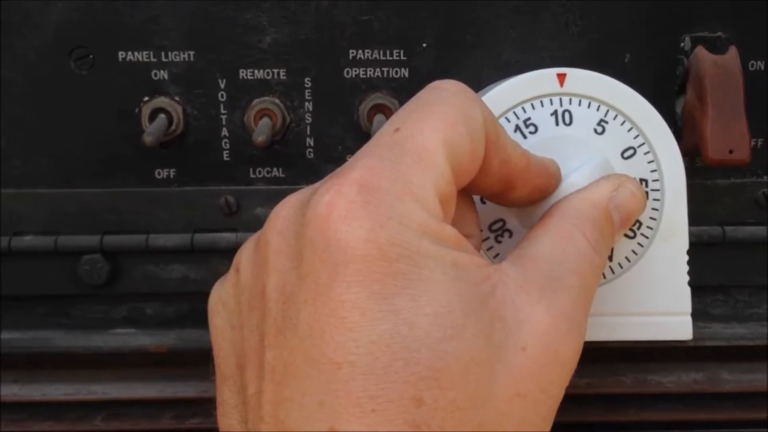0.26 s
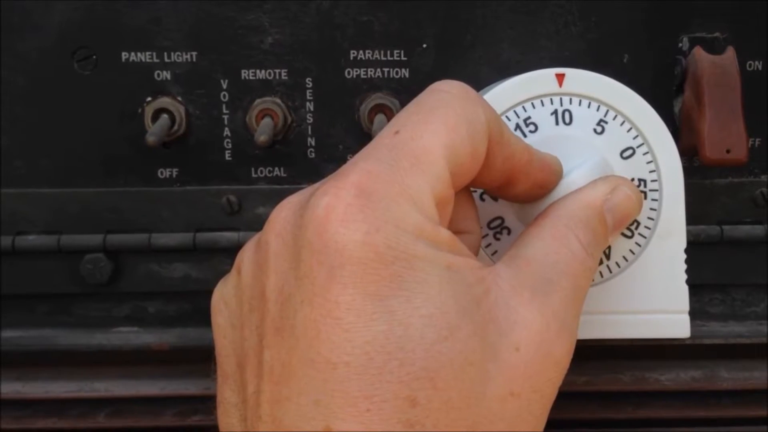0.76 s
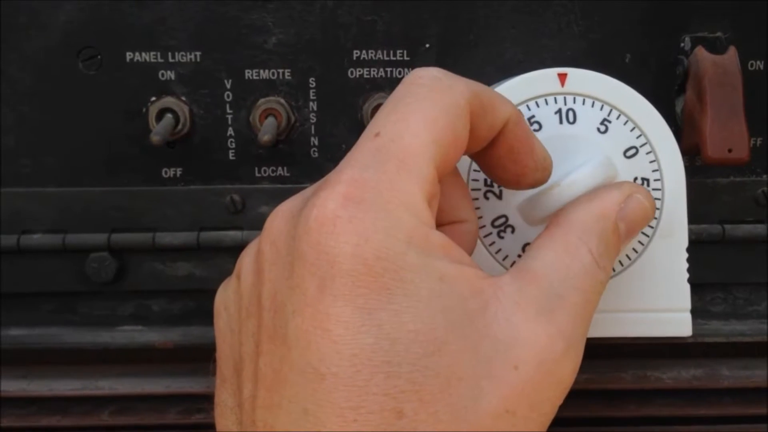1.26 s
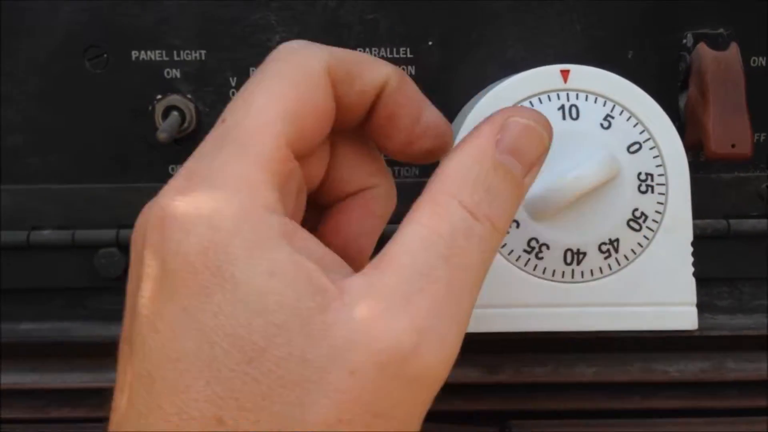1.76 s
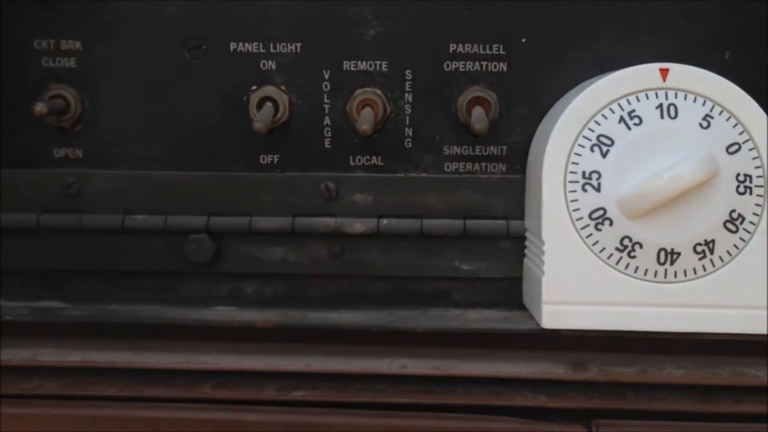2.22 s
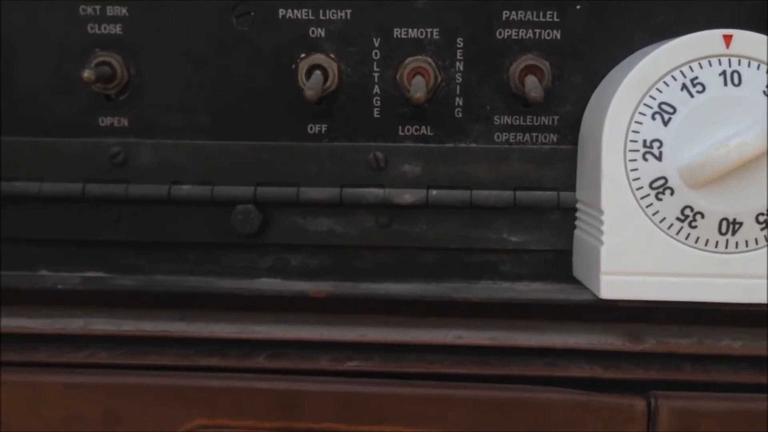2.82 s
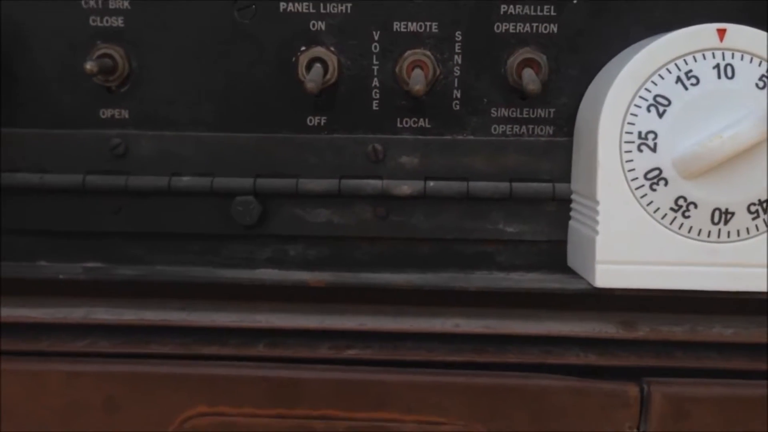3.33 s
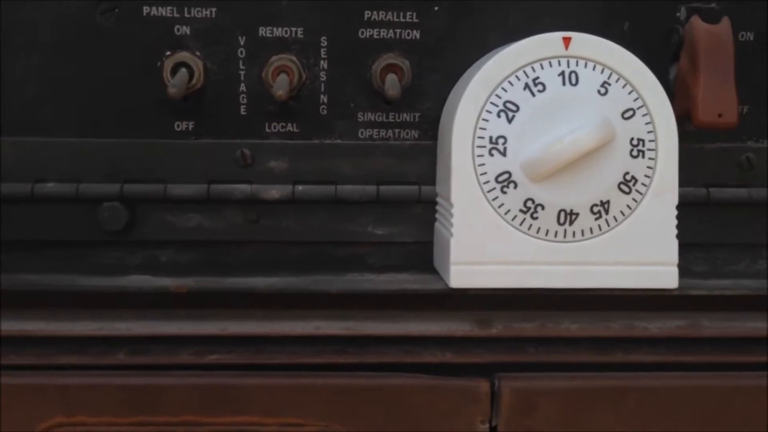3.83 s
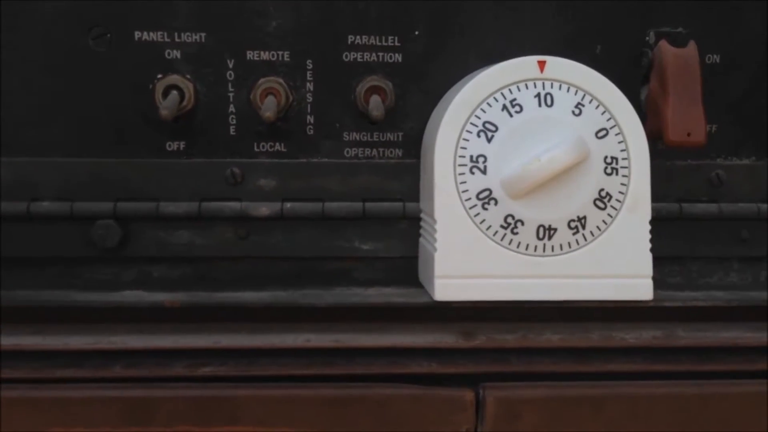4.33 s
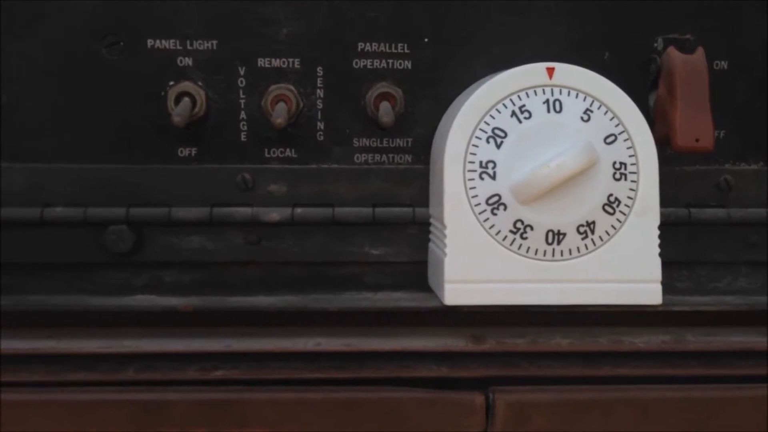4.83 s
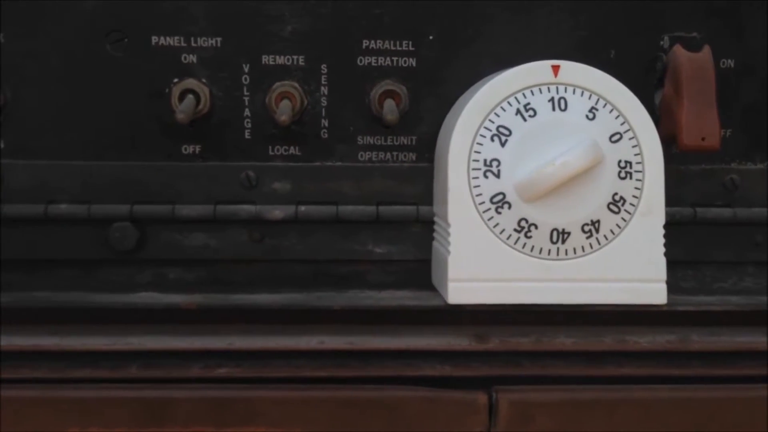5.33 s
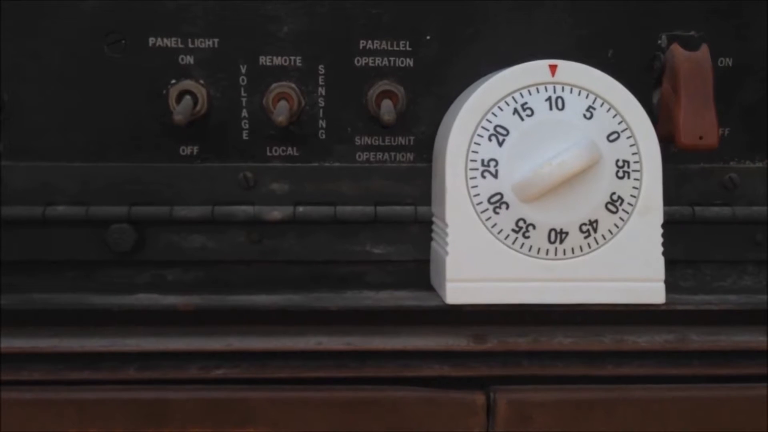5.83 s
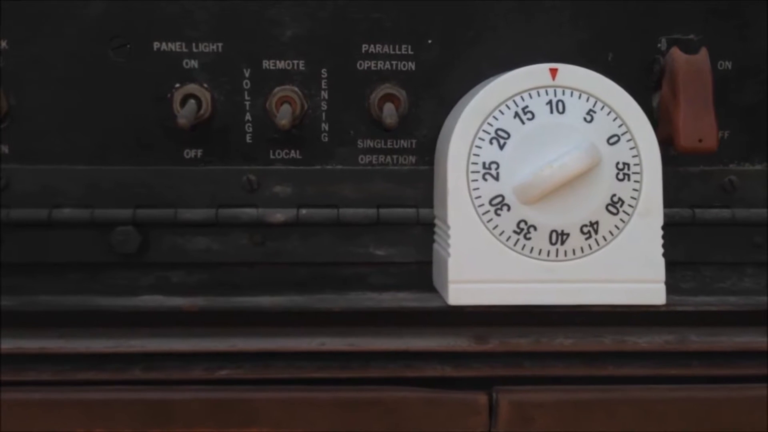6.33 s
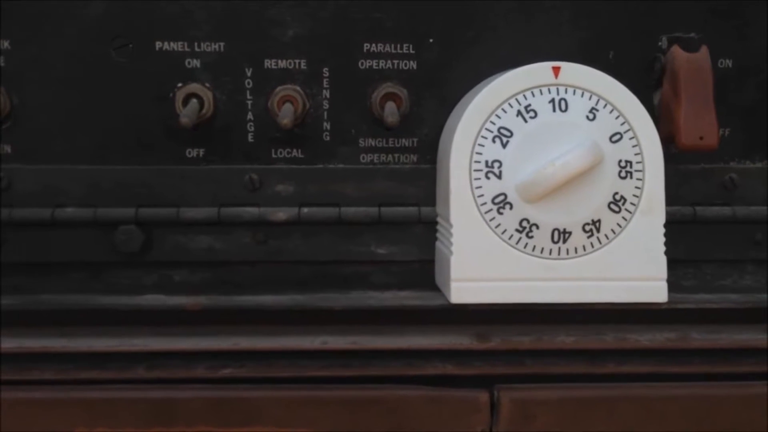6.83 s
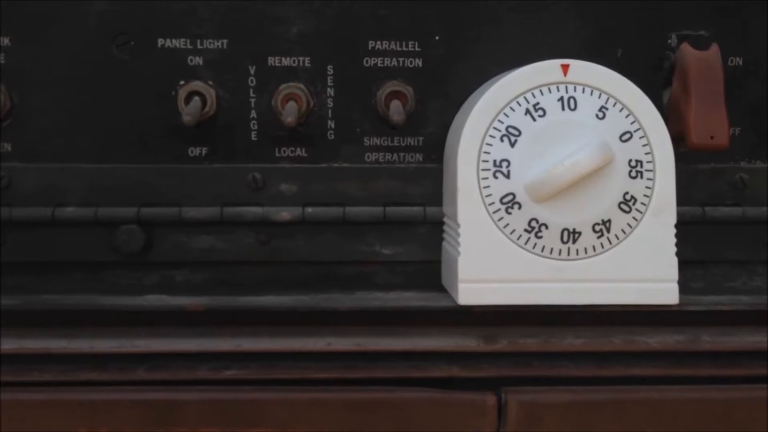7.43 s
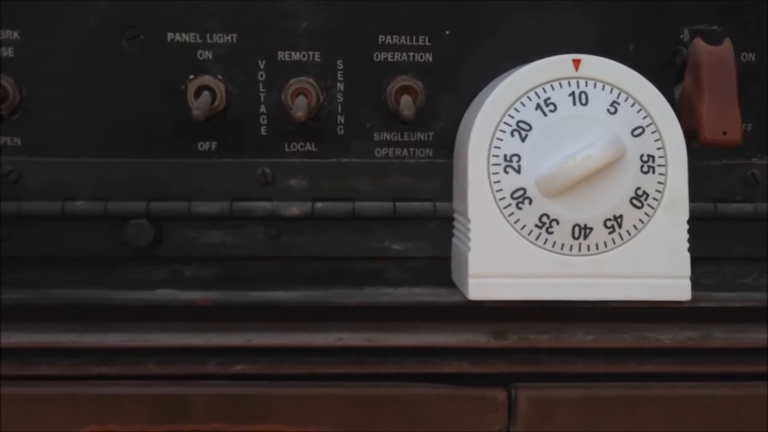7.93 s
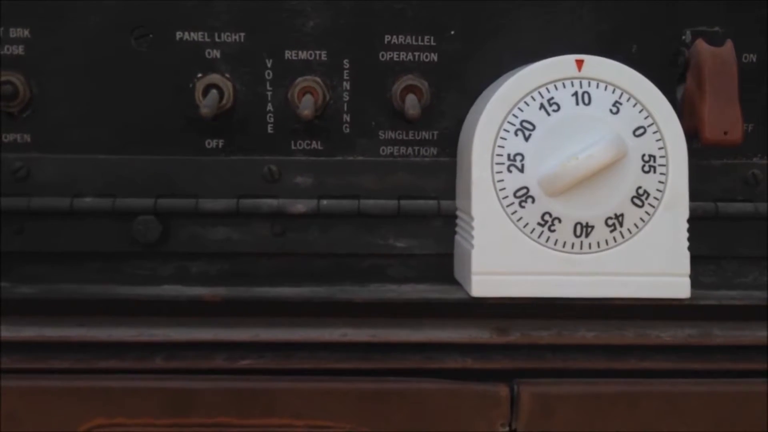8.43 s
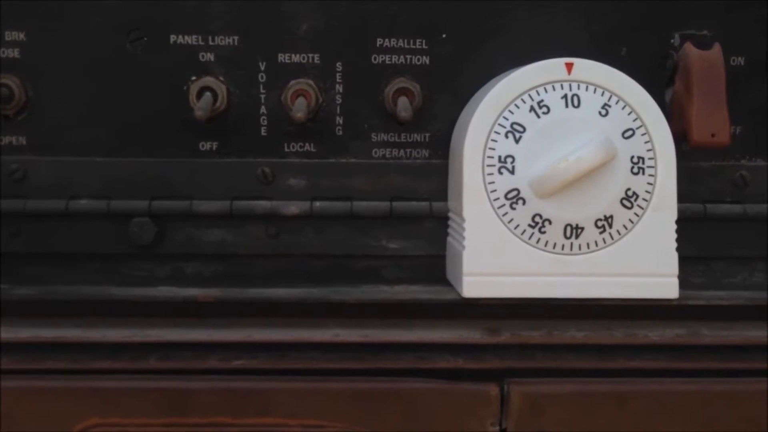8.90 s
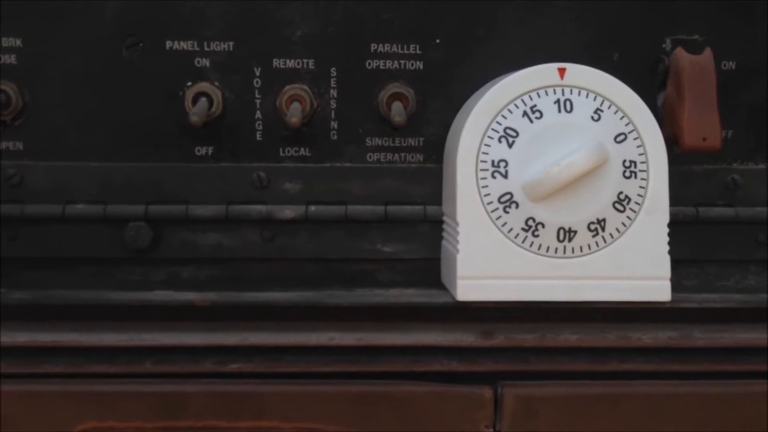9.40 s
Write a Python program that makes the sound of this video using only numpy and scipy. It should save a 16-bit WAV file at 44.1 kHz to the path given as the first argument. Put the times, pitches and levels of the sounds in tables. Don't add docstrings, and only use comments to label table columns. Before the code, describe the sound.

A wind-up timer ticks faintly, a toggle switch snaps, then a starter slams and a big diesel engine wheezes, catches, surges and drones steadily.

```python
import sys
import numpy as np
from scipy import signal
from scipy.fft import rfft, irfft, next_fast_len
from scipy.io import wavfile

SR = 44100
rng = np.random.default_rng(int(sys.argv[2]) if len(sys.argv) > 2 else 0)


def undo_db(level):
    steps = np.asarray(level, float) / 20
    return 10 ** steps


def wav_out(sig):
    wavfile.write(sys.argv[1], SR, np.round(np.clip(np.atleast_2d(sig).T, -1, 1) * 32767).astype(np.int16))


N = 426006
TIME_S = np.arange(N) / SR


def noise(count=N):
    return rng.standard_normal(count)


def evened(x):
    return x / np.sqrt(np.mean(x ** 2) + 1e-20)


def read(points, hz):
    f, value = np.transpose(points)
    return np.interp(np.log(hz + 1), np.log(f + 1), value)


def bumps(modes, hz):
    return sum(db / (1 + (2 * (hz - f) / width) ** 2) for f, width, db in modes)


def curves(rows):
    s, *columns = np.transpose(rows)
    return [np.interp(TIME_S, s, c) for c in columns]


def add(mix, s, sound):
    part = mix[round(s * SR):][:len(sound)]
    part += sound[:len(part)]


def coloured(x, gain_db):
    size = next_fast_len(len(x))
    gain = undo_db(gain_db(np.fft.rfftfreq(size, 1 / SR)))
    return evened(irfft(rfft(x, size) * gain, size)[:len(x)])


def wobble(per_s):
    return coloured(noise(), lambda hz: -20 * np.log10(1 + (hz / per_s) ** 2))


def rung(modes, drive, spread):
    t = np.arange(SR // 3) / SR
    tune = 1 + spread * noise(len(modes))
    ring = 0
    for (hz, db, t60), k in zip(modes, tune):
        ring = ring + undo_db(db - 60 * t / t60) * np.sin(2 * np.pi * hz * k * t)
    out = signal.fftconvolve(ring, drive)
    return out / abs(out).max()


def burst(spectrum, rise, t60):
    t = np.arange(SR // 2) / SR
    out = coloured(noise(len(t)), lambda hz: read(spectrum, hz))
    out = out * np.minimum(t / rise, 1) * undo_db(-60 * t / t60)
    return out / abs(out).max()


def tent(s, rise_db_per_s, fall_db_per_s):
    t = TIME_S - s
    return np.where(t < 0, rise_db_per_s * t, -fall_db_per_s * t)


def peaks(rows, rise_db_per_s, fall_db_per_s):
    tents = [db + tent(s, rise_db_per_s, fall_db_per_s) for s, db in rows]
    return np.maximum(np.max(tents, 0), 0)


def swells(rows):
    power, t = np.zeros(N), np.arange(SR) / SR
    for s, db, length in rows:
        shape = np.minimum(6.5 * t / length, 1) / (1 + (t / length) ** 6)
        add(power, s, (undo_db(db) * shape) ** 2)
    return np.sqrt(power)


def fade_in(start_s, length_s):
    return np.clip((TIME_S - start_s) / length_s, 0, 1)


def sounding(rows):
    return np.clip(np.minimum(TIME_S - rows[0][0], rows[-1][0] + 0.018 - TIME_S) / 0.024, 0, 1)


# time_s, firings_per_s
SPEED = [(5.7, 2), (6.0, 9), (6.4, 14), (6.6, 25), (6.7, 34.4), (6.93, 44.1), (7.14, 54), (7.35, 62.3),
         (7.5, 69), (7.62, 71.3), (7.7, 71), (7.85, 69.2), (8.0, 67.9), (8.3, 65.7), (8.45, 64.8),
         (8.75, 63.8), (9.05, 62.95), (9.66, 62.3)]
# time_s, effort_db
EFFORT = [(5.7, -15), (6.0, -3.5), (6.3, -3.5), (6.6, -3), (6.79, 2.5), (7.08, 2.5), (7.24, 5), (7.48, 5.5),
          (7.62, -0.5), (7.75, -3.5), (8.06, -2.5), (8.6, 0), (9.0, 0), (9.66, 0.5)]
RATED_PER_S = 63
# pitch_hz, level_db
PIPE = [(45, 5), (63, -17.5), (70, -4.5), (118, -2), (141, -1.5), (190, 0), (250, -6.5), (270, -7.5)]
# pitch_hz, width_hz, level_db
PIPE_NOTCH = [(132, 2.9, -9.5)]
ORDERS_DB = [-18.5, -14, -11, -23]
ORDER_WANDER_DB = [2, 1.54, 0.22, 0.81]
# multiple_of_six_stroke_cycle, level_db
LOPE = [(4, -34), (5, -32), (7, -25), (8, -27), (9, -25), (10, -19), (11, -15), (13, -21), (14, -27),
        (15, -20), (16, -19), (17, -25), (19, -20), (20, -24), (21, -24), (28, -25), (30, -26), (32, -28),
        (35, -27), (36, -25), (39, -29), (44, -28), (48, -26)]
LOPE_DB, LOPE_DB_PER_HZ = -11.5, -0.5
LOPE_PEAK_PER_S, LOPE_FADE_DB_PER_HZ = 57, .6
CAUGHT_PER_S, MISFIRE_DB_PER_HZ = 61.5, 0.6
# time_s, level_db
SURGES = [
    (7.27, 7.5),
    (7.365, 7),
    (7.55, 7),
    (7.625, 4.5),
    (7.705, 2.5),
    (7.8, 3.5),
]
SURGE_DB_PER_S, ORDER_EFFORT = 136, 0.023


def exhaust(turns):
    speed, effort_db = curves(SPEED)[0], curves(EFFORT)[0]
    cycle_hz = speed / 6
    misfire_db = MISFIRE_DB_PER_HZ * np.minimum(speed - CAUGHT_PER_S, 0)
    surge_db = peaks(SURGES, SURGE_DB_PER_S, SURGE_DB_PER_S)
    lines = []
    for k, db, wander_db in zip((6, 12, 18, 24), ORDERS_DB, ORDER_WANDER_DB):
        pipe_db = read(PIPE, k * cycle_hz) + bumps(PIPE_NOTCH, k * cycle_hz)
        fuel_db = ORDER_EFFORT * effort_db + (k == 12) * surge_db + k / 6 * misfire_db
        lines.append((k, db + pipe_db + fuel_db + wander_db * wobble(14.0)))
    lope_db = LOPE_DB + LOPE_DB_PER_HZ * np.clip(speed - RATED_PER_S, LOPE_PEAK_PER_S - RATED_PER_S, 0)
    lope_db += LOPE_FADE_DB_PER_HZ * np.minimum(speed - LOPE_PEAK_PER_S, 0)
    for k, db in LOPE:
        reach_db = -10 * np.log10(1 + (55 / (k * cycle_hz)) ** 4)
        lines.append((k, lope_db + db + reach_db))
    drift = .011 * wobble(6)
    drone = sum(undo_db(db + 2) * np.sin(2 * np.pi * (k / 6 * (turns + drift) + rng.random()))
                for k, db in lines)
    return drone * fade_in(6.55, 0.55)


# time_s, peak_db, pitch_hz
FIRINGS = [
    (6.512, -17, 159),
    (6.606, -21, 110),
    (6.649, -16, 196),
    (6.734, -13, 190),
    (6.805, -12, 150),
    (6.844, -11, 156),
    (6.904, -14, 140),
    (6.984, -12, 135),
    (7.084, -12, 140),
    (7.156, -12, 175),
]
FIRING_T60, FIRING_RISE_S = 0.16, 0.0046


def firings():
    out, t = np.zeros(N), np.arange(SR // 5) / SR
    for s, db, hz in FIRINGS:
        ring = np.sin(2 * np.pi * hz * t) + 0.12 * np.sin(2 * np.pi * 2.1 * hz * t)
        add(out, s, undo_db(db - 60 * t / FIRING_T60) * np.minimum(t / FIRING_RISE_S, 1) * ring)
    return out


# time_s, peak_db, t60_s
STARTER = [
    (5.708, -31, 0.068),
    (5.7165, -16.5, 0.11),
    (5.736, -21, .06),
    (5.75, -25, 0.087),
    (5.762, -20, 0.092),
    (5.779, -3, 0.17),
]
SLAM_S = STARTER[-1][0]
# time_s, peak_db, length_s
PUFFS = [
    (6.049, -14, 0.061),
    (6.073, -11.5, 0.073),
    (6.169, -15, 0.066),
    (6.252, -17, 0.052),
    (6.363, -22, 0.035),
    (6.427, -19.5, 0.03),
    (6.493, -18.5, 0.038),
    (6.559, -18.5, 0.077),
    (6.665, -15, 0.092),
]
# start_s, level_db, length_s
GASPS = [(6.05, -60, .03), (6.07, -38.5, 0.034), (6.095, -55, 0.039), (6.172, -57, .03),
         (6.198, -56, 0.027), (6.265, -59, .03), (6.286, -48, 0.024), (6.363, -53, .035), (6.428, -48, .02),
         (6.45, -48, .04), (6.49, -47, 0.031), (6.565, -43, 0.021), (6.582, -51, .05), (6.635, -51, 0.061),
         (6.38, -55, .04), (6.52, -57, .04), (6.68, -44, .03), (6.74, -48, 0.075), (6.82, -57, 0.16)]
# rated_speed_db, effort_share, db_per_firing_per_s_off_rated, under_wheeze_db
REGISTERS = [(-23.5, 0.56, 0.63, -27), (-25.5, 1, 0.08, -17.5), (-28.5, 0.92, 0, -35),
             (-45, .15, 0.02, -39)]
# build_up_db_per_s, peak_db, fall_db_per_s
ENGAGE = [(490, -24.5, 100), (560, -17.5, 102), (464, -21, 144), (398, -30, 180)]
RUSH_DB = [-28.5, -32, -48, -35.5]
RUSH_S, RUSH_LENGTH_S = 6.68, .3
AIR_SHUT_DB, AIR_OPENS_PER_S = -5, 30


def levels():
    off_rated = curves(SPEED)[0] - RATED_PER_S
    effort_db = curves(EFFORT)[0]
    wheeze = swells(PUFFS)
    rush = swells([(RUSH_S, 0, RUSH_LENGTH_S)])
    slow = np.clip((AIR_OPENS_PER_S - RATED_PER_S - off_rated) / 10, 0, 1)
    gasps = 0, 0, 0, swells(GASPS)
    for register, engage, rush_db, gasp in zip(REGISTERS, ENGAGE, RUSH_DB, gasps):
        db, share, slope_db, wheeze_db = register
        rise, slam_db, fall = engage
        steady = undo_db(db + share * effort_db + slope_db * off_rated + tent(SLAM_S, rise, 0))
        steady = steady * undo_db(AIR_SHUT_DB * np.any(gasp) * slow)
        slam = undo_db(slam_db + tent(SLAM_S, rise, fall))
        parts = steady, undo_db(6) * gasp, undo_db(wheeze_db) * wheeze, undo_db(rush_db) * rush, slam
        yield np.sqrt(sum(p ** 2 for p in parts))


# pitch_hz, level_db_per_hz
THUD = [(15, -18), (40, -1), (65, 3.5), (110, 8), (150, 9.5), (220, 8.5), (300, -5.5), (450, -45.5)]
# pitch_hz, level_db_per_hz
RUNNING = [(150, -17), (270, -1.5), (500, -6), (1000, -7.5), (2100, -15), (4400, -23.5), (5600, -30),
           (7500, -38), (10000, -43.5), (13000, -51), (15500, -54)]
# pitch_hz, width_hz, boost_db
HOUSING = [(466, 37, 7.5), (1085, 83, 7), (1370, 25, 3.5), (1567, 33, 2.5), (1660, 40, 2), (1710, 31, 7),
           (2420, 32, 5.5), (3270, 70, 1.5), (4940, 25, 4.5), (6880, 130, 4)]
CYLINDERS_DB = [-3.5, -15, 2.7, 0, -0.5, -4]
STROKE = [(1, 0.084), (0.059, 0.075), (0.29, 0.074), (0.67, 0.091)]


def block(turns):
    strength = undo_db(np.take(CYLINDERS_DB, turns.astype(int) % 6) + 2.2 * wobble(40))
    push = strength * np.exp(-(turns % 1) / 1.2)
    late = turns + 0.014 * wobble(30)
    fires = np.diff(np.floor(late), prepend=0) > 0
    knocks = evened(strength * fires * (turns > 9))
    gust = undo_db(.8 * wobble(25))

    def body(hz, lo_hz, hi_hz):
        edges = (1 + (lo_hz / (hz + 1)) ** 8) * (1 + (hz / hi_hz) ** 8)
        return read(RUNNING, hz) + bumps(HOUSING, hz) - 10 * np.log10(edges)

    colours = [lambda hz: read(THUD, hz),
               lambda hz: body(hz, 234, 1470),
               lambda hz: body(hz, 1357, 7900) - 10 * np.log10(1 + (hz / 9500) ** 8),
               lambda hz: body(hz, 6370, 18000)]
    out = np.zeros(N)
    for gain, (depth, knock), colour in zip(levels(), STROKE, colours):
        drive = (1 + depth * push) * noise() + knock * knocks
        out += gain * gust * coloured(drive, colour)
    return out * (TIME_S >= STARTER[0][0])


CLANKS_PER_S, CLANK_DB, CLANK_T60, CLANK_SLOPE_DB_PER_OCTAVE = 260, -33, .075, -4.5


def valves():
    first, t = round(SLAM_S * SR), np.arange(SR // 10) / SR
    count = N - first
    blows = undo_db(3.26 * np.minimum(rng.exponential(1, count), 4)) * (rng.random(count) < CLANKS_PER_S / SR)
    part = rng.integers(0, 24, count)
    pitches = np.geomspace(420, 3600, 24) * rng.uniform(.96, 1.04, 24)
    clanks = np.zeros(count)
    for k, hz in enumerate(pitches):
        fade = undo_db(CLANK_SLOPE_DB_PER_OCTAVE * np.log2(hz / 420) - 60 * t / CLANK_T60)
        ring = fade * np.sin(2 * np.pi * hz * t) * np.minimum(t / 0.0015, 1)
        clanks += signal.oaconvolve(blows * (part == k), ring)[:count]
    return undo_db(CLANK_DB + 0.47 * curves(EFFORT)[0]) * np.r_[np.zeros(first), evened(clanks)]


# teeth_per_firing, level_db
GEARS = [(17.5, 1.5), (22, -7), (27, -4.5)]
MESH_DB, MESH_EFFORT, MESH_START_S, MESH_FADE_S = -35.5, .2, 6.5, .4


def gears(turns):
    tones = sum(undo_db(db + 3 * wobble(12)) * np.sin(2 * np.pi * (k * turns + .07 * wobble(12)))
                for k, db in GEARS)
    return undo_db(MESH_DB + MESH_EFFORT * curves(EFFORT)[0]) * tones * fade_in(MESH_START_S, MESH_FADE_S)


# time_s, peak_db, pitch_hz
RATTLES = [(6.838, -24, 9850), (6.891, -23, 7500), (6.9499, -35, 9120), (6.9649, -26, 9250),
           (6.9903, -27, 8100), (7.4448, -25.5, 8630), (7.4942, -24, 8600), (7.5516, -32, 9070),
           (7.7117, -37, 8700), (7.8609, -39, 8680), (7.9348, -21, 8340), (7.9771, -27, 8680),
           (8.022, -21, 8250), (8.0794, -36, 8480), (8.1003, -29, 8560), (8.1208, -35, 7860),
           (8.448, -30, 9000), (8.5034, -43, 7900), (8.5418, -30, 9100), (8.568, -26, 9100),
           (8.5993, -25, 9300), (8.459, -31, 9000), (8.477, -33, 9300), (8.608, -29, 9300),
           (8.64, -31, 9200), (8.659, -29, 9000), (8.67, -35, 9300), (9.64, -29, 9000), (8.7314, -30, 8050),
           (8.7733, -27, 7910), (8.8585, -29, 8600), (8.9235, -28, 7300), (8.9609, -28, 7790),
           (9.2477, -31, 8600), (9.3869, -39, 8550), (9.4702, -36.5, 8350), (9.5351, -35, 8470)]


def rattles():
    out = np.zeros(N)
    for s, db, hz in RATTLES:
        ping = rung([(hz, 0, .009), (1.07 * hz, -3, .008)], noise(40), 0.0039)
        tick = burst([(3000, -25), (6000, -10), (10000, -1), (15000, -6)], .0003, 0.037)
        add(out, s, undo_db(db - 3.5) * ping)
        add(out, s + 0.013, undo_db(db - 10) * ping)
        add(out, s, undo_db(db - 8) * tick)
    return out


# time_s, peak_db, build_up_db_per_s
BOOM = [
    (5.85, -20, 188),
    (6.06, -31, 154),
    (6.24, -24.5, 92),
    (6.522, -23, 220),
    (6.844, -17.5, 28),
    (7.3, -12.5, 50),
]
# pitch_hz, width_hz, level_db
CABINET = [(75, 17, -3.5), (148, 35, -3.5), (194, 30, -10.5), (219.6, 17, -4), (293.5, 17.5, -8)]
BOOM_SPAN = [(5.76,), (7.3,)]
BOOM_FALL_DB_PER_S, BOX_FLOOR_HZ = 49, 52


def cabinet():
    def colour(hz):
        modes = sum(undo_db(2 * db) / (1 + (2 * (hz - f) / width) ** 2) for f, width, db in CABINET)
        return 10 * np.log10(modes / (1 + (BOX_FLOOR_HZ / (hz + 1)) ** 8))

    boom_db = np.max([db + tent(s, rise, BOOM_FALL_DB_PER_S) for s, db, rise in BOOM], 0)
    return undo_db(boom_db) * coloured(noise(), colour) * sounding(BOOM_SPAN)


# start_s, peak_db, length_s
HEAVES = [
    (5.781, -22.5, 0.15),
    (5.92, -34, 0.063),
    (6.02, -24, 0.086),
    (6.182, -27, 0.19),
    (6.351, -29.5, 0.11),
]
HEAVE_HZ = 70


def heaves():
    out = np.zeros(N)
    for s, db, length in HEAVES:
        t = np.arange(0, length, 1 / SR)
        add(out, s, undo_db(db) * np.sin(np.pi * t / length) * np.sin(2 * np.pi * HEAVE_HZ * t))
    return out


# pitch_hz, level_db_per_hz
SKIP_TEETH = [(300, -10), (1000, -8), (1800, -1), (3500, -9), (6000, -16.5), (11000, -19), (15000, -29)]
# pitch_hz, level_db_per_hz
SLAM = [(35, -43), (60, -39), (593, 0), (1130, -12), (1530, -24), (1880, -25), (2320, -16.5), (3130, -18),
        (3950, -21), (8670, -31.5), (15100, -42)]
# pitch_hz, level_db, t60_s
FRAME = [(70.4, -31, 0.65), (152, -28, 0.4), (248.7, 9, 1), (304, 3, 0.75), (413, 4, 0.58), (470, -7, 0.27),
         (524, 8, 0.49), (1040, 1, 0.13), (1195, -16, 0.18)]
# pitch_hz, level_db_per_hz
WHEEZE = [(880, -30), (1500, -35), (2060, -5), (3250, 1), (4180, -10.5), (6580, -15), (9000, -21),
          (15100, -55)]
# pitch_hz, width_hz, boost_db
PORTS = [(1850, 120, 19), (2080, 76, 14), (2400, 50, 13), (2826, 54, 9.5), (3250, 120, 2), (5000, 300, 8),
         (6860, 220, 3)]


def starter():
    out = np.zeros(N)
    *skips, (slam_s, slam_db, slam_t60) = STARTER
    for s, db, t60 in skips:
        add(out, s, undo_db(db - 3.5) * burst(SKIP_TEETH, 0.0032, t60))
    add(out, slam_s, undo_db(slam_db + 1.0) * burst(SLAM, 0.00039, slam_t60))
    add(out, slam_s, undo_db(slam_db - 12.0) * rung(FRAME, [1.], 0))
    for s, db, length in PUFFS:
        t = np.arange(SR // 4) / SR / length
        tune = 1 + .03 * np.sin(9 * (s - PUFFS[1][0]))
        air = coloured(noise(len(t)), lambda hz: read(WHEEZE, hz) + bumps(PORTS, hz * tune))
        add(out, s, undo_db(db - 12.5) * air * np.minimum(4 * t, 1) / (1 + t ** 6))
    return out


# time_s, pitch_hz, level_db
WHINE = [(5.9, 1062, -54), (5.98, 1075, -29), (6.05, 1085, -32), (6.075, 1030, -37), (6.1, 1050, -31),
         (6.16, 1070, -28), (6.19, 1040, -33), (6.28, 1016, -31), (6.32, 1002, -66)]


def whine():
    hz, db = curves(WHINE)
    tone = np.sin(2 * np.pi * np.cumsum(hz + 5.9 * wobble(25.6)) / SR)
    return undo_db(db + 2.2 * wobble(25)) * tone * sounding(WHINE)


# pitch_hz, level_db, t60_s
RELAY = [(1750, -10, .06), (3350, -9, .06), (4420, -2, .06), (8600, -11, .05), (10800, -16, .025)]
# pitch_hz, level_db, t60_s
PINION = [(456, -10, 0.092), (582, -13, 0.12), (800, -13, .15), (1414, -2, 0.13), (3160, -16, 0.21),
          (5050, -18, .09), (6380, -18, .085), (6900, -40, 0.25), (7900, -30, .15)]
RELAY_DB, PINION_DB = -27.5, -9.5
# time_s, peak_db, pitch_hz, t60_s
SQUEAKS = [
    (.2, -56, 3750, 0.16),
    (.385, -61, 2000, 0.2),
    (.64, -46, 2710, 0.042),
    (2.09, -70, 2300, .06),
    (2.19, -65, 1800, .06),
    (4.226, -60, 3980, .03),
    (4.302, -53, 1110, .025),
    (4.392, -59, 2200, .03),
]


def metal():
    out = np.zeros(N)
    for s, db, _ in STARTER[:3]:
        add(out, s, undo_db(RELAY_DB + 0.28 * (db + 15)) * rung(RELAY, noise(200), 0.04))
    add(out, SLAM_S, undo_db(PINION_DB) * rung(PINION, noise(300), 0))
    for s, db, hz, t60 in SQUEAKS:
        add(out, s, undo_db(db) * rung([(hz, 0, t60), (1.1 * hz, -6, t60)], noise(250), .005))
    return out


# time_s, peak_db, pitch_hz, length_s
SCUFFS = [(1.09, -54, 1050, 0.13), (1.93, -58, 1500, .04), (2.03, -59, 2300, 0.055), (2.12, -63, 3250, .08),
          (2.1, -63, 1200, .12), (2.5, -62, 1250, .04), (2.66, -58, 1550, .08), (2.77, -61, 2750, .05),
          (2.8, -60, 1150, .06), (7, -18, 1100, 0.043), (8.1, -23, 1450, .03), (6.46, -17.5, 720, 0.026),
          (6.495, -18, 1000, 0.04), (6.57, -19, 2400, 0.035), (6.508, -24, 2000, .02),
          (7.4, -13, 2300, 0.028), (6.618, -21, 1800, 0.028), (7.3, -15, 2100, 0.031),
          (6.563, -30, 5400, 0.019), (7.238, -30, 4100, .015), (7.255, -27, 4250, 0.033),
          (3.14, -57, 2200, .015), (3.158, -56, 2500, 0.032), (3.315, -58, 4600, .015),
          (6.76, -22, 2420, 0.059)]


def scuffs():
    out = np.zeros(N)
    for s, db, hz, length in SCUFFS:
        count = round(length * SR)
        stroke = np.hanning(count) * noise(count)
        add(out, s, undo_db(db) * rung([(hz, 0, .03), (1.06 * hz, -4, .025)], stroke, 0.0039))
    return out


HELD_S = [.196, .4185, .637, .860, 1.081]
FREE_FIRST_S, PAIR_S, TOCK_AFTER_S = 1.3068, .45335, .2191
BEATS_DB = [-38.5, -40, -37.5, -42, -40.5, -41, -40, -43.5, -40.5, -41.5, -42, -40.5, -43, -42.5, -41.5,
            -45, -43, -45, -42, -42.5, -43, -44, -41, -45.5, -42]


def beats():
    free = FREE_FIRST_S + PAIR_S * np.arange(10)
    return zip(np.sort(np.r_[HELD_S, free, free + TOCK_AFTER_S]), BEATS_DB)


# pitch_hz, level_db_per_hz
TICK = [(700, -10), (1300, -5.5), (2700, -6.5), (3400, -6), (4200, 1), (6000, -7), (9000, -6.5),
        (12000, -7.5), (15000, -4.5)]
# pitch_hz, width_hz, boost_db
WHEEL = [(9000, 630, 6.5), (13600, 1400, 3), (6800, 500, 3)]
# delay_s, share, t60_s
CHATTERS = [
    [(-.0015, 1.05, .04), (.0038, .8, .035), (.006, .35, .045)],
    [(-.001, 1.05, .05), (.001, .55, .035), (.0025, .4, .04)],
]
# pitch_hz, level_db, t60_s
CASE = [(1790, -8, 0.065), (2790, 1, 0.05), (3900, 3.5, 0.052), (4530, 4, 0.038), (4800, -8, 0.029),
        (5800, -9, 0.013)]
# pitch_hz, level_db, t60_s
TOCK_CASE = [(1900, -5, .04), (2700, -5, .03), (4010, 2, 0.048), (4750, 5, .03), (7100, -6, .02),
             (8900, -9, .02)]
LEAD_S, LEAD_SHARE = .006, .1


def timer():
    out, t = np.zeros(N), np.arange(900) / SR - LEAD_S
    lead = round((LEAD_S - .002) * SR)
    for k, (s, db) in enumerate(beats()):
        odd = k % 2
        chatter = LEAD_SHARE * (t < 0)
        for at, share, t60 in CHATTERS[odd if k >= len(HELD_S) else 0]:
            chatter = chatter + share * (t > at) * undo_db(-60 * (t - at) / t60)
        tune = 1 + 0.033 * np.sin(2.4 * k)
        knock = coloured(noise(900), lambda hz: read(TICK, hz) + bumps(WHEEL, hz * tune))
        add(out, s - LEAD_S, undo_db(db - 8.5) * knock * chatter * np.clip((.014 - t) / 0.006, 0, 1))
        shell = rung((TOCK_CASE, CASE)[odd], chatter[lead:lead + 400] * noise(400), 0.026)
        add(out, s - .002, undo_db(db - 8.5) * shell)
    return out


# start_s, level_db, length_s
RUBS = [
    (1.04, -70, 0.18),
    (1.93, -70, 0.33),
    (2.25, -78, .4),
    (2.65, -69.5, 0.31),
]
# time_s, peak_db, pitch_hz
TAPS = [(0.302, -52, 3770), (0.399, -56, 2170), (0.469, -56, 1550), (0.744, -46.5, 3900), (1.066, -48, 940),
        (1.16, -39, 970), (1.423, -50, 1220), (1.489, -59, 867), (1.952, -48, 2880), (2.034, -51.5, 2950),
        (2.044, -51, 1530), (2.058, -54, 1250), (2.124, -58, 1170), (2.157, -53, 3270), (2.57, -44.5, 1480),
        (2.699, -63, 1550), (2.779, -52, 915), (2.829, -58, 1130), (3.809, -49.5, 810)]
# time_s, peak_db
TOGGLE = [
    (3.1875, -33),
    (3.1995, -8),
]
# pitch_hz, level_db_per_hz
SNAP = [(180, -39), (300, -28), (638, -21.5), (2110, -3.5), (3810, -12), (4560, -4), (8100, -15),
        (13700, -18.5), (15100, -17)]
# pitch_hz, level_db, t60_s
PANEL = [(151, -8.5, 0.46), (319.5, -7, 0.15), (396, -4.5, 0.15), (1800, -4, 0.17), (3100, -7, 0.16),
         (4650, -4, 0.11), (5814, -15, 0.27), (6790, 7, 0.039)]


def hand():
    cloth = [(600, -21), (1200, 3), (1600, -6), (2200, -8), (3100, -7), (5000, -19)]
    creak = [(1200, -19.0), (2500, -7.0), (4500, -0.5), (6000, -20.5), (10000, -29.0)]
    tail = [(200, -2), (600, -9.0), (2000, -6.5), (3500, -14), (7000, -26), (15000, -41)]
    grains = undo_db(3.7 * wobble(60)) * noise()
    out = swells(RUBS) * coloured(grains, lambda hz: read(cloth, hz))
    for s, db, hz in TAPS:
        modes = [(hz, 0, .025), (10 / 9 * hz, -4, .02), (1.72 * hz, -9, .015)]
        add(out, s, undo_db(db - 1.5) * rung(modes, noise(300), .01))
    (creak_s, creak_db), (snap_s, snap_db) = TOGGLE
    add(out, creak_s, undo_db(creak_db) * burst(creak, .0006, 0.044))
    add(out, snap_s, undo_db(snap_db) * burst(SNAP, 0.001, 0.045))
    add(out, snap_s, undo_db(snap_db - 20.5) * burst(tail, 0.011, 0.23))
    add(out, snap_s, undo_db(snap_db - 13.5) * rung(PANEL, [1.], 0))
    return out


# pitch_hz, level_db_per_hz
HISS = [(150, -31), (250, -7), (488, -5), (600, -8.5), (1080, -11.5), (1770, -18), (2410, -17),
        (2810, -16.5), (3450, -15.5), (15100, -20)]
HISS_DB, HISS_DUCK_DB = -63, -10
# pitch_hz, level_db_per_hz
TRAFFIC = [(12, -46.5), (20, -20), (38, -5.5), (92, -1), (139, -4), (182, -4.5), (220, -12.5), (372, -27),
           (500, -34), (650, -46), (1100, -120)]
# time_s, depth_db
LULLS = [
    (1.52, 8),
    (2.7, 3),
    (4.14, 2),
    (4.85, 4),
]
RUMBLE_DB, LULL_IN_DB_PER_S, LULL_OUT_DB_PER_S = -57.5, 70, 11
# start_s, peak_s, start_hz, peak_db
HUM = [
    (0, 1.444, 158.3, -63),
    (1.593, 3.0, 180.1, -60),
    (3.405, 4.106, 190.2, -64.5),
]
HUM_LAST_HZ, HUM_SWELL_DB_PER_S, HUM_DROP_DB_PER_S = 194, 1.5, 21


def yard():
    hiss_db = HISS_DB + HISS_DUCK_DB * (TIME_S > SLAM_S)
    hiss = undo_db(hiss_db) * coloured(noise(), lambda hz: read(HISS, hz))
    lull_db = peaks(LULLS, LULL_IN_DB_PER_S, LULL_OUT_DB_PER_S)
    rumble_db = RUMBLE_DB - lull_db + 1.1 * wobble(7.7)
    rumble = undo_db(rumble_db) * coloured(noise(), lambda hz: read(TRAFFIC, hz))
    hz, = curves([(s, f) for s, _, f, _ in HUM] + [(HUM[-1][1], HUM_LAST_HZ)])
    hum_db = np.max([top_db + tent(s, HUM_SWELL_DB_PER_S, HUM_DROP_DB_PER_S) - 99 * (TIME_S < start)
                     for start, s, _, top_db in HUM], 0)
    hum_db = hum_db - 0.5 - 0.58 * lull_db + 1.4 * wobble(5.4)
    hum = undo_db(hum_db) * np.sin(2 * np.pi * np.cumsum(hz + 1.36 * wobble(7.4)) / SR)
    return hiss + rumble + hum


# time_s, depth_db
STUMBLES = [(6.71, 7.5), (6.78, 8.5), (6.88, 7.5), (6.935, 6.5), (7.05, 7), (7.13, 3.5), (7.21, 7),
            (7.49, 10), (7.59, 6.5), (7.67, 4), (7.75, 1.5), (7.84, -2), (8.11, 4)]
STUMBLE_IN_DB_PER_S, STUMBLE_OUT_DB_PER_S = 150, 292


def scene():
    turns = np.cumsum(curves(SPEED)[0]) / SR
    sag_db = peaks(STUMBLES, STUMBLE_IN_DB_PER_S, STUMBLE_OUT_DB_PER_S)
    drone = (exhaust(turns) + cabinet()) * undo_db(-sag_db)
    engine = drone + firings() + block(turns) + valves() + gears(turns) + rattles() + heaves()
    cranking = starter() + whine() + metal() + scuffs()
    return (engine + cranking + timer() + hand() + yard())[None]


def band_limit(x):
    return signal.sosfilt(signal.butter(12, 15260, fs=SR, output="sos"), x)


def record(dry):
    clipped = np.clip(dry, -.99, .99)
    lowpass = signal.firwin(801, 15350, window=("kaiser", 9), fs=SR)
    mix = signal.oaconvolve(clipped, lowpass[None], "same")
    return band_limit(mix)


dry = scene()
out = record(dry)
wav_out(out)
```